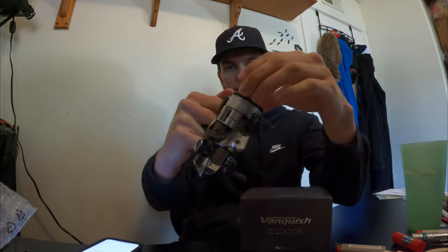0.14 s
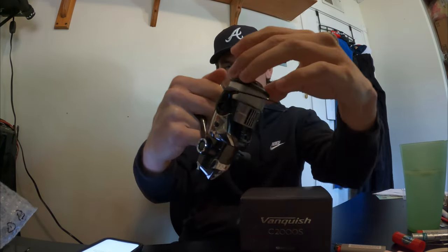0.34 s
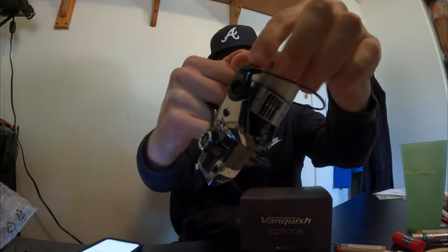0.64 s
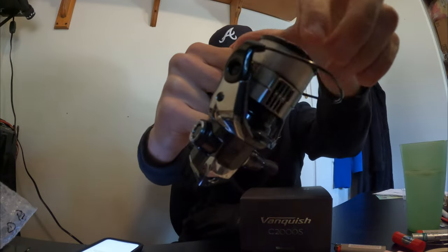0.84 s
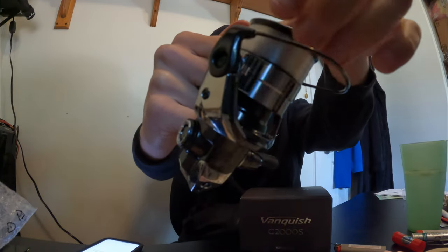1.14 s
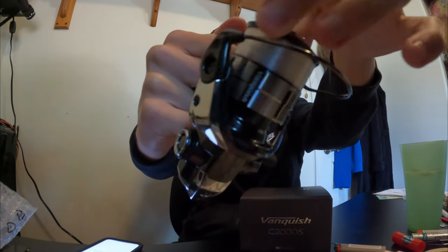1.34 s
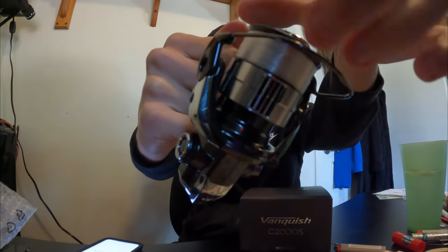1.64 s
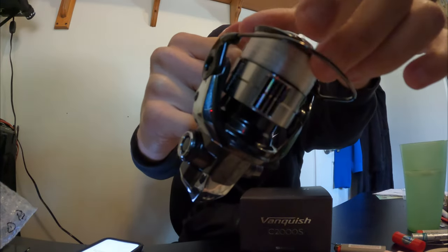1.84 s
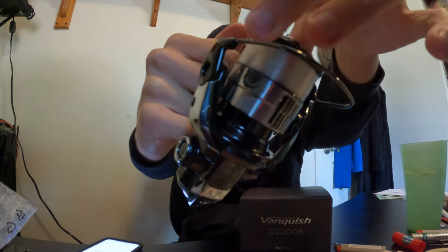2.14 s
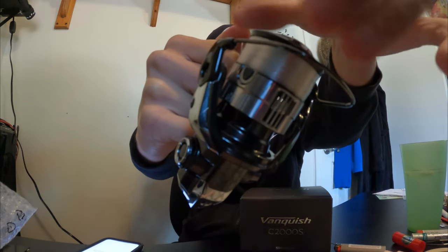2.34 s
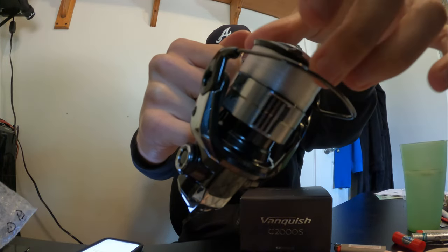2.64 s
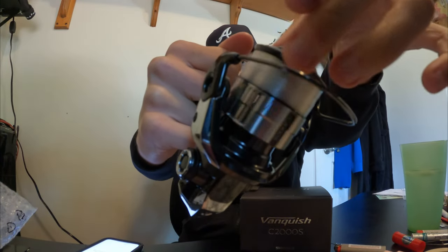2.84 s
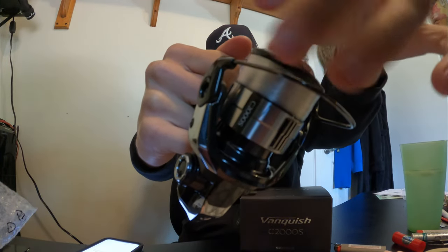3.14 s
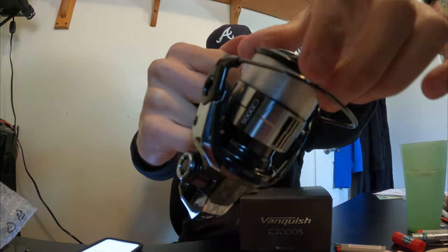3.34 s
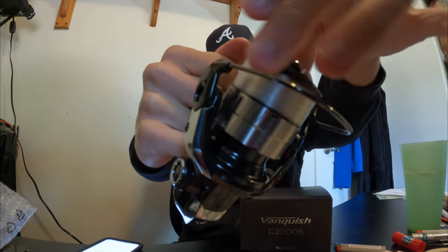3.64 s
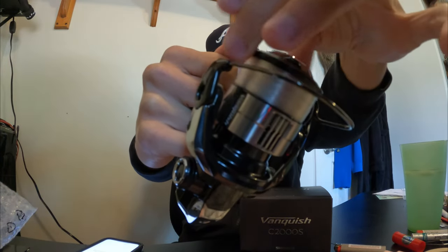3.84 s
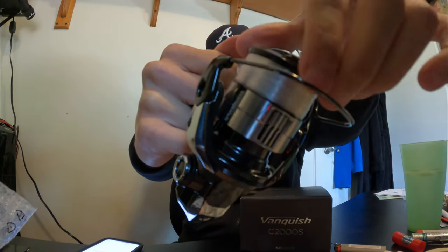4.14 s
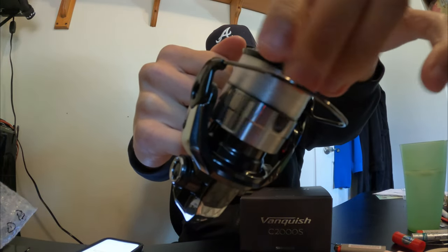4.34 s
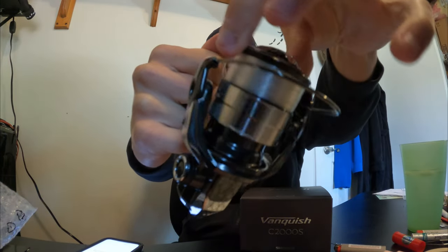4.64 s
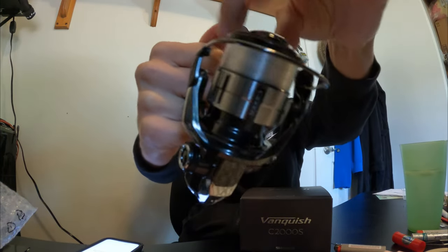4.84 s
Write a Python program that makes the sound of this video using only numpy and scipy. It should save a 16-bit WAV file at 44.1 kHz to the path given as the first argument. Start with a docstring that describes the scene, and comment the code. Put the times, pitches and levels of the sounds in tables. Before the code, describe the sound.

Six runs of crisp, high, dry ratchet clicks from a small metal reel, each lasting about a third to half a second, separated by near-silent gaps. The opening run is a little quieter and more roomy, with two very soft dull desk knocks; then the reel is nearer and brighter. Faint fingertip touches fall between runs. Close stereo pickup, small indoor room, low rumble and thin hiss beneath.

```python
"""A fishing reel's spool, turned by hand close to a stereo microphone, clicks in six bursts: the drag's
spring pawl snaps from tooth to tooth, each snap a few milliseconds of chatter that rings the metal spool.
Snaps are decaying sines plus coloured noise, echoed by a quiet room of sparse reflections.
Light finger ticks are short noise puffs; dull knocks are low desk modes blurred by a noise scuff.
A low rumble and faint hiss, made of random short-time spectra, lie under it all."""
import sys
import numpy as np
from scipy import signal
from scipy.fft import rfft, irfft, next_fast_len
from scipy.io import wavfile
from scipy.ndimage import uniform_filter1d

SR = 44100
rng = np.random.default_rng(int(sys.argv[2]) if len(sys.argv) > 2 else 0)


def boost_factor(decibels):
    """Convert a level in decibels to a linear amplitude factor."""
    exponent = np.asarray(decibels, float) / 20
    return 10 ** exponent


def wav_out(sig):
    """Save sig, one row per channel (or a flat mono array), as 16-bit PCM at SR to the path in sys.argv[1]."""
    wavfile.write(sys.argv[1], SR, np.round(np.clip(np.atleast_2d(sig).T, -1, 1) * 32767).astype(np.int16))


N = 220346

# pawl snaps: t/s, dry peak level/dB, nominal pawl f/Hz, bell and bright level/dB re pawl ring
SNAPS = [(0.0427, -15.5, 5820, -28.5, -30.5), (0.1233, -15.5, 5680, -21.5, -30.5),
         (0.1994, -15.5, 6245, -16, -19), (0.256, -13.5, 5630, -8.5, -9.5), (0.3126, -15, 5860, -24, -30.5),
         (0.382, -14, 6260, -19, -17.5), (0.4362, -15.5, 5620, -20, -16.5),
         (0.4848, -15, 6380, -30.5, -29.5), (0.5313, -13, 5950, -30, -8.5),
         (1.2184, -12.5, 5630, -38.5, -21), (1.274, -9, 5540, -22.5, -24.5), (1.331, -9, 5490, -18.5, -18),
         (1.3879, -9, 5540, -15.5, -21.5), (1.4539, -9, 5940, -19.5, -27), (1.5, -10, 5740, -21.5, -21.5),
         (1.5387, -10, 5610, -14, -16.5), (1.5858, -9, 6380, -25, -19.5), (2.0153, -11.5, 5620, -33, -12),
         (2.0762, -10, 5750, -21, -21), (2.1292, -8.5, 5750, -35.5, -15), (2.1784, -10.5, 5620, -35, -22.5),
         (2.221, -11.5, 5620, -17, -14), (2.2615, -11, 5940, -21.5, -24), (2.3066, -10.5, 5940, -33, -28),
         (2.7593, -13.5, 5940, -35, -15.5), (2.8343, -9.5, 5530, -27, -6.5),
         (2.9035, -10, 5730, -44, -11.5), (2.9765, -9, 5810, -14.5, -17.5), (3.029, -9, 5850, -27.5, -21),
         (3.0737, -9.5, 5820, -32.5, -14.5), (3.1175, -11, 5860, -18.5, -30.5),
         (3.5328, -14.5, 5820, -16.5, -14.5), (3.5814, -11, 6380, -21, -26),
         (3.6305, -9.5, 5710, -19, -29.5), (3.678, -8.5, 5690, -16.5, -17.5),
         (3.7245, -8, 5780, -22.5, -11), (3.7705, -8.5, 5790, -29.5, -14.5),
         (3.806, -10.5, 5830, -15, -30.5), (3.8399, -9.5, 6000, -12.5, -31),
         (3.874, -10, 5680, -12.5, -32.5), (3.931, -9.5, 5890, -17, -22), (4.3665, -13, 5950, -26.5, -20),
         (4.4207, -8.5, 5750, -19.5, -26), (4.4798, -8.5, 5740, -25.5, -4), (4.5296, -9.5, 5620, -24, -29),
         (4.569, -12.5, 5710, -19, -8), (4.6173, -10, 5610, -25, -16), (4.6803, -10, 5830, -42.5, -20),
         (4.7247, -10, 5950, -27, -35), (4.7693, -10, 5860, -14.5, -8.5), (4.81, -8.5, 5950, -39.5, -5),
         (4.8368, -10.5, 5600, -12.5, -23.5), (4.8572, -10, 5350, -13.5, -41)]
# one snap just before the start, still ringing: same columns
EARLIER_SNAP = (-.03, -18, 5800, -27, -19)
# low body ring, drifting as the spool turns in the hand: t/s, level/dB re pawl ring before its high-pass
BODY_LEVEL = [(.05, -18), (.3, -20), (.5, -13), (1.22, -12.5), (1.45, -16.5), (2.05, -17.5), (2.22, -9),
              (2.76, -9), (2.97, -21), (3.12, -17), (3.56, -11.5), (3.75, -16), (3.84, -12), (3.93, -18),
              (4.45, -19.5), (4.57, -9), (4.85, -12.5)]
# nominal spool and frame modes: f/Hz, relative level/dB, t60/s, left lag/rad
BODY_MODES = [(590, -18.5, 0.009, .1), (1170, -13, 0.013, .2), (1640, -6.5, 0.011, 0.33),
              (1983, -1.5, .014, 0.93), (2350, -5.5, 0.022, 0.95), (2655, 2.5, 0.019, 0.28)]
# nominal bell-like modes: f/Hz, relative level/dB, t60/s, left lag/rad
BELL_MODES = [(3140, 0, 0.04, 0.64), (3070, -9.5, 0.025, 1)]
# nominal bright modes: f/Hz, relative level/dB, t60/s, left lag/rad
BRIGHT_MODES = [(9340, 3.5, 0.089, 0.1), (8860, -7, 0.027, .3), (9300, -15.5, .03, .3),
                (12100, -31.5, .012, .2)]
# nominal shell modes: f/Hz, relative level/dB, t60/s, left lag/rad
SHELL_MODES = [(3400, -25.5, .0045, 0.43), (4870, -16, 0.01, .3), (6000, -29.5, 0.085, 0.28),
               (6972, -12.5, 0.011, .5), (7440, -10, 0.0086, .5), (7930, -20, .011, 0.36),
               (10716, -14, 0.0055, .2), (11490, -11.5, 0.0071, .1), (12340, -13, 0.013, 1.5),
               (13000, -13, 0.0055, 1), (13800, -15, 0.0092, 2), (14260, -17.5, .005, 3.1)]
# nominal long thin rings: f/Hz, relative level/dB, t60/s, left lag/rad
FINE_MODES = [(4120, -38, .09, .4), (4335, -34, .11, .4), (4365, -39, .08, .4), (6385, -23, .065, .4),
              (6475, -26, .05, .4), (6600, -30, .04, .4)]
# broad edge of a snap: f/Hz, relative level/(dB per Hz)
CRACK_COLOUR = [(880, -59), (1500, -26), (4850, -18), (5640, -5), (6760, -27), (8600, -17), (9310, -8.5),
                (12800, -22.5), (16500, -43)]
# crack noise between the microphone ports: f/Hz, left lag/rad
PORT_LAG = [(1700, 0.34), (6400, 0.62), (11500, 0.53), (12400, 1.4), (15000, 4.8)]
# stereo lean of the reel: f/Hz, left minus right level/dB
REEL_LEAN = [(60, 12.5), (180, -3), (550, -5), (1650, -1), (4970, -2.5), (15000, 1.5)]
# fingers ticking on the spool: t/s, dry peak level/dB, f/Hz
TICKS = [(0.367, -54, 1300), (0.78, -70, 5000), (0.819, -57, 5460), (.9194, -67, 2550),
         (1.184, -59.5, 1500), (1.195, -58, 1110), (1.869, -65.5, 2404), (1.968, -60.5, 1700),
         (2.382, -54, 2530), (2.689, -77.5, 1800), (3.2245, -63.5, 2314), (3.4194, -82.5, 2030),
         (4.241, -68.5, 5800)]
# dull knocks through the desk: t/s, peak level/dB
KNOCKS = [(0.034, -50.5), (0.467, -44)]
# nominal desk modes: f/Hz, relative level/dB, t60/s
DESK_MODES = [(193, 4, .06), (235, -9.5, .12), (279, -4.5, 0.16), (374, 2.5, 0.036), (440, -6.5, 0.046),
              (510, 2.5, 0.044), (598, 0.5, 0.046), (670, -4, .04)]
# room decay: f/Hz, t60/s
ROOM_T60 = [(1000, 0.33), (3000, 0.15), (7000, 0.18), (13000, 0.14)]
# room colour: f/Hz, relative level/dB
ROOM_COLOUR = [(1000, -3.5), (3000, 1), (4300, 0.5), (5800, -6), (7800, 6), (9500, -4), (12000, 2),
               (14500, 6.5)]
# the reel comes nearer, the room recedes: t/s, relative level/dB
WETNESS = [(.3, 3.5), (1.2, -3), (4.6, -3.5)]
# room tone spectrum: f/Hz, relative level/(dB per Hz)
AIR_COLOUR = [(12, -28), (22, 1), (37, -8), (60, -23), (85, -21.5), (110, -36), (142, -16.5), (190, -16),
              (370, -27.5), (780, -34), (1450, -35.5), (7300, -54), (12200, -63), (13000, -66.5),
              (16000, -72.5)]
# room tone: f/Hz, left-right likeness/1
AIR_SAME = [(30, 0.86), (80, 0.95), (200, 0.67), (600, .3), (2000, 0.35), (12000, 0.12)]
# room tone: f/Hz, left minus right level/dB
AIR_LEAN = [(60, -1), (180, -6.5), (550, -7.5), (1650, -1.5), (4970, 2.5), (15000, 1.5)]
# air moving at the microphone, strongest near 0.1 s: t/s, gain of the lowest bins/dB
RUMBLE = [(0, 2.5), (.11, 13.5), (.35, 2.5), (0.749, -7.5), (1.7, 3.5), (2.7, -7), (3.501, 1), (4.6, -6.5),
          (5, 2.5)]
# treble hiss, strongest near 1.2 s: t/s, gain of the treble/dB
HISS = [(0, 6), (.9, 13), (1.2, 14.5), (1.699, 7), (2.7, 7), (5, 10)]

PAWL_T60_S, CHATTER_S = 0.022, 0.0026
SEATED_T60_S, SEATED_FLOOR_DB = 0.008, -18
MODE_SPREAD_DB, FINE_SPREAD_DB = 3, 6.5  # long thin rings depend most on where the blow lands
BASS_CUT_HZ, BODY_CUT_HZ = 1804, 560  # the small spring radiates little bass, the frame a little more
SCUFF_T60_S = 0.22
ROOM_DB = -11.5
LEAD_S = 0.05  # run-in, trimmed off
AIR_RMS_DB = -61  # of the channel mean, before rumble and hiss gains
LUMPS_DB = 2  # standard deviation of the rumble gain
EDGE_HZ, EDGE_WIDTH_HZ = 15800, 1800


def read(points, hz):
    """Straight lines between points on a log-frequency axis."""
    f, value = np.transpose(points)
    return np.interp(np.log(hz + 1), np.log(f + 1), value)


def over_time(points, s):
    """Straight lines between points in time."""
    return np.interp(s, *np.transpose(points))


def add(mix, s, sound):
    """Adds a two-channel sound at time s."""
    part = mix[:, round(s * SR):][:, :sound.shape[1]]
    part += sound[:, :part.shape[1]]


def peaked(x):
    """Scales the highest swing to 1."""
    return x / (abs(x).max() + 1e-12)


def coloured(x, points_db):
    """Gives each channel a smooth spectral colour."""
    hz = np.fft.rfftfreq(x.shape[1], 1 / SR)
    return irfft(rfft(x) * boost_factor(points_db(hz)), x.shape[1])


def above(x, hz):
    """Steep causal high-pass."""
    return signal.sosfilt(signal.butter(4, hz, "high", fs=SR, output="sos"), x)


def ring(modes, chance, spread_db, length_s=0.18, drift_s=0.00033):
    """Dying sines; each blow lands elsewhere: levels and phases differ, pitch varies most when damped."""
    t = np.arange(round(length_s * SR)) / SR
    out = 0
    for (hz, db, t60, lag), (size, turn, drift) in zip(modes, chance):
        blow_hz = hz * (1 + drift_s / t60 * (2 * drift - 1))
        phase = 2 * np.pi * (blow_hz * t + turn) - np.array([[lag], [0]])
        level_db = db + spread_db * (2 * size - 1.5)
        out = out + boost_factor(level_db - 60 * t / t60) * np.sin(phase)
    return out


def chatter_blows(hops):
    """The first blow, then weaker rebounds of random time, size and sign."""
    blows = np.zeros((1, round(CHATTER_S * SR) + 2))
    blows[0, (hops[:, 0] * CHATTER_S * SR).astype(int) + 1] = 0.22 * (2 * hops[:, 1] - 1)
    blows[0, 0] = 1
    return blows


def crack(n):
    """Noisy edge of a snap: coloured noise, mostly common to both ports, left channel lagging."""
    noise = rng.standard_normal((3, n))
    grit = coloured(noise[2] + 0.5 * noise[:2], lambda hz: read(CRACK_COLOUR, hz))
    lag = read(PORT_LAG, np.fft.rfftfreq(n, 1 / SR))
    grit[0] = irfft(rfft(grit[0]) * np.exp(-1j * lag), n)
    return grit * boost_factor(-60 * np.arange(n) / SR / 0.1)


def snap(db, pawl_hz, body_db, bell_db, bright_db):
    """The spring strikes the next tooth, rebounds a few times, then seats and damps its own ring."""
    chance = rng.random((6, len(SHELL_MODES), 3))
    hops = rng.random((6, 2))
    blows = chatter_blows(hops)

    def struck(modes, draws, spread_db=MODE_SPREAD_DB):
        """Modes rung by every blow of the chatter."""
        return signal.fftconvolve(ring(modes, draws, spread_db), blows, axes=1)

    body = struck(BODY_MODES, chance[0])
    bell = struck(BELL_MODES, chance[1])
    bright = struck(BRIGHT_MODES, chance[2])
    shell = struck(SHELL_MODES, chance[3])
    fine = struck(FINE_MODES, chance[4], FINE_SPREAD_DB)
    pawl = struck([(pawl_hz, 0, PAWL_T60_S, 0.25)], chance[5])
    t = np.arange(pawl.shape[1]) / SR
    grit = crack(len(t))

    seat_s = CHATTER_S * (0.34 + 1.2 * hops[0, 1])
    seated = np.maximum(boost_factor(-60 * np.maximum(t - seat_s, 0) / SEATED_T60_S), boost_factor(SEATED_FLOOR_DB))
    late = np.minimum(t / 0.0012, 1)  # treble builds up as the chatter spreads through the spool
    contact = np.minimum(t / 0.0008, 1) ** 2  # contact takes a few cycles
    treble = boost_factor(bright_db) * peaked(bright) + boost_factor(1.5) * peaked(grit)
    spring = seated * (peaked(pawl) + late * treble)
    spool = boost_factor(bell_db) * peaked(bell) + boost_factor(4.0) * late * (shell + fine)
    frame = above(boost_factor(body_db) * peaked(body) * contact, BODY_CUT_HZ)
    return boost_factor(db) * peaked(above((spring + spool) * contact, BASS_CUT_HZ) + frame)


def tick(db, hz):
    """A soft fingertip tap: a short noise puff gathered round one pitch."""
    t = np.arange(1500) / SR
    noise = rng.standard_normal((2, len(t)))
    # 24 dB per octave away from the pitch
    puff = coloured(noise, lambda f: -24 * np.minimum(abs(np.log2((f + 1) / hz)), 1.6))
    envelope = boost_factor(-60 * t / 0.035) * np.minimum(t / 0.001, 1)
    return boost_factor(db) * peaked((puff.sum(0) + 0.5 * puff) * envelope)


def knock(db):
    """Something soft bumps the desk and scuffs it for a moment; the low modes blur together."""
    modes = [(*mode, 0.2) for mode in DESK_MODES]  # left lag/rad appended
    thud = ring(modes, rng.random((len(modes), 3)), 0.94, length_s=0.25)
    thud *= np.minimum(np.arange(thud.shape[1]) / SR / 0.0032, 1) ** 2  # padded contact
    scuff = rng.standard_normal((2, 6000)) * boost_factor(-60 * np.arange(6000) / SR / SCUFF_T60_S)
    return boost_factor(db) * peaked(signal.fftconvolve(thud, scuff[0] + 0.5 * scuff, axes=1))


def room_tail():
    """Sparse reflections of random sign, each band dying at its own speed."""
    size = SR // 3
    taps = np.zeros((2, size))
    at = np.arange(120, size - 20, 20)
    at = at + rng.integers(0, 20, (2, len(at)))
    np.put_along_axis(taps, at, rng.choice([-1., 1.], at.shape), 1)
    hz, t, z = signal.stft(taps + 0.5 * taps[::-1], SR, nperseg=128)
    decay = boost_factor(-60 * t / read(ROOM_T60, hz)[:, None])
    tail = signal.istft(z * decay, SR, nperseg=128)[1]
    return tail / np.linalg.norm(tail[0])


def room(x):
    """Reflections of the reel and fingers; three random tails take turns."""
    t = np.arange(x.shape[1]) / SR
    wet = boost_factor(over_time(WETNESS, t - LEAD_S))
    out = np.zeros_like(x)
    for k in range(3):
        share = wet * np.sqrt(2 / 3) * np.cos(2 * np.pi * (7 * t + k / 3))
        out += signal.fftconvolve((x.mean(0) * share)[None], room_tail(), axes=1)[:, :len(t)]
    return boost_factor(ROOM_DB) * coloured(out, lambda hz: read(ROOM_COLOUR, hz))


def air():
    """Room tone: random short-time spectra with soft patches; bass and treble gains move in time."""
    frames, hz = N // 512 + 5, np.fft.rfftfreq(2048, 1 / SR)
    t = np.arange(frames) * 512 / SR
    a, b, c, d, patches = rng.standard_normal((frames, 1025, 5)).T
    patches = uniform_filter1d(uniform_filter1d(patches, size=20, axis=0), size=6, axis=1)
    same = np.clip(read(AIR_SAME, hz), -1, 1)[:, None]
    left = a + 1j * b
    right = same * left + np.sqrt(1 - same ** 2) * (c + 1j * d)
    z = np.array([left, right])
    z *= boost_factor(read(AIR_COLOUR, hz)[:, None] + 0.74 * patches / patches.std())
    z *= boost_factor(np.outer([0.5, -0.5], read(AIR_LEAN, hz)))[:, :, None]
    scale = boost_factor(AIR_RMS_DB) / signal.istft(z, nperseg=2048, noverlap=1536)[1].mean(0).std()

    lumps = np.sqrt(6) * uniform_filter1d(rng.standard_normal(frames), size=6)
    rumble_db = over_time(RUMBLE, t) + LUMPS_DB * lumps
    z *= boost_factor(np.outer(1 / (1 + (hz / 75) ** 4), rumble_db))
    z *= boost_factor(np.outer(1 / (1 + (6500 / (hz + 1)) ** 3), over_time(HISS, t)))
    return scale * signal.istft(z, nperseg=2048, noverlap=1536)[1][:, :N]


def scene():
    """Reel and fingers near the microphone, their reflections, desk knocks and room tone."""
    lead = round(LEAD_S * SR)
    reel = np.zeros((2, next_fast_len(N + lead)))
    for s, db, pawl_hz, bell_db, bright_db in [EARLIER_SNAP, *SNAPS]:
        body_db = over_time(BODY_LEVEL, s)
        add(reel, s + LEAD_S, snap(db, pawl_hz, body_db, bell_db, bright_db))
    for s, db, hz in TICKS:
        add(reel, s + LEAD_S, tick(db, hz))
    reel = coloured(reel, lambda hz: np.outer([0.5, -0.5], read(REEL_LEAN, hz)))
    desk = np.zeros((2, N))
    for s, db in KNOCKS:
        add(desk, s, knock(db))
    return (reel + room(reel))[:, lead:lead + N] + desk + air()


def band_limit(x):
    """A steep low-pass at the top of the band."""
    return signal.sosfilt(signal.butter(12, 16810, fs=SR, output="sos"), x)


def record(dry):
    """The treble rolls off towards the band limit."""
    start = dry[:, :1]
    padded = np.pad(dry, ((0, 0), (0, next_fast_len(N + 999) - N)), "edge")
    rolled = coloured(padded - start,
                      lambda hz: -20 * np.clip((hz - EDGE_HZ) / EDGE_WIDTH_HZ + 0.5, 0, 3) ** 2)
    mix = rolled[:, :N] + start
    return band_limit(mix)


dry = scene()
out = record(dry)
wav_out(out)
```